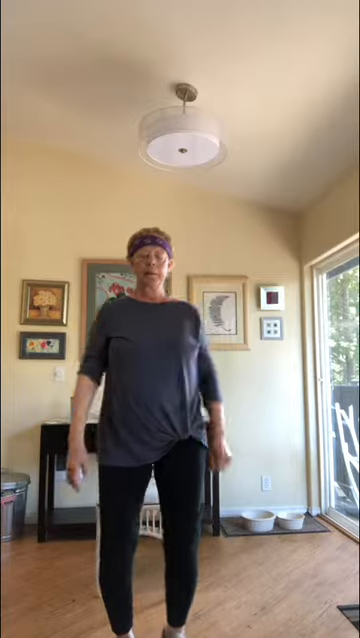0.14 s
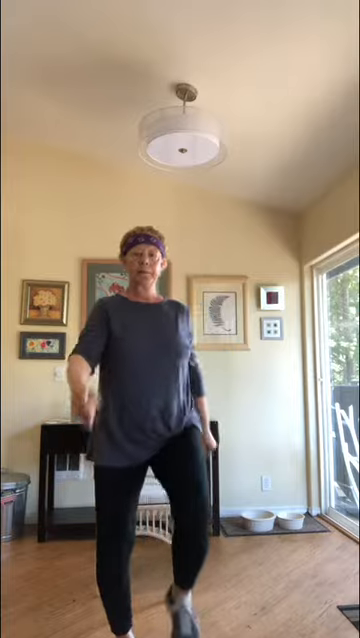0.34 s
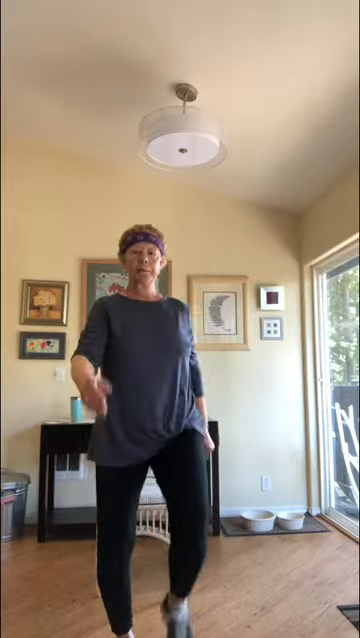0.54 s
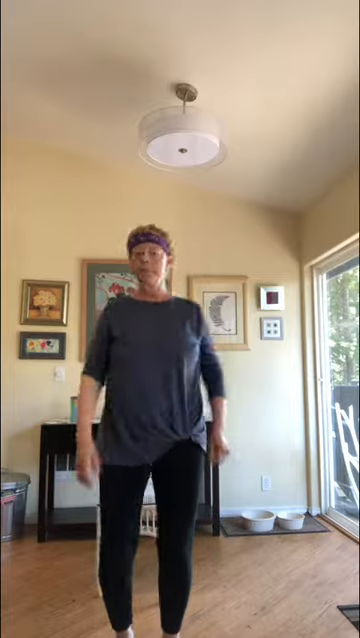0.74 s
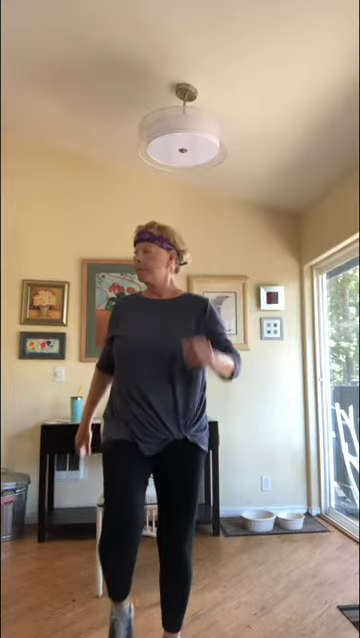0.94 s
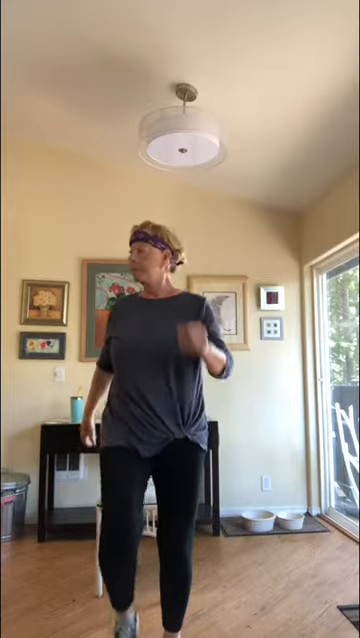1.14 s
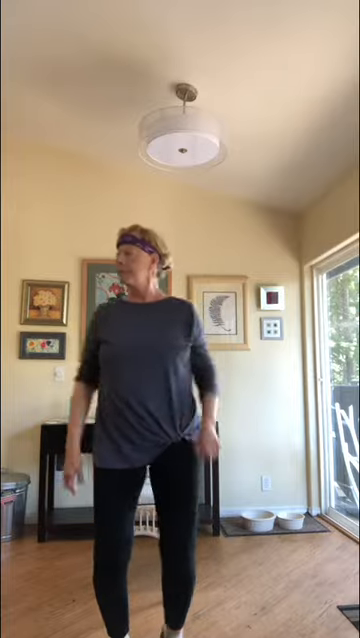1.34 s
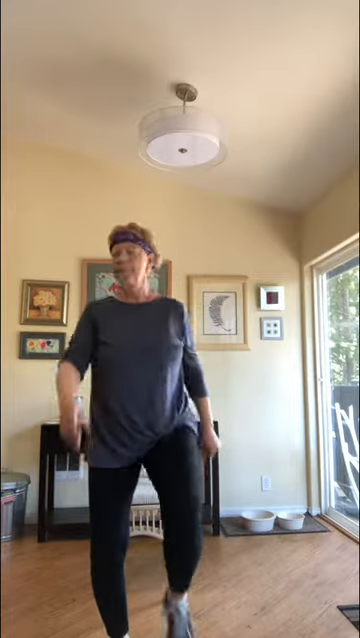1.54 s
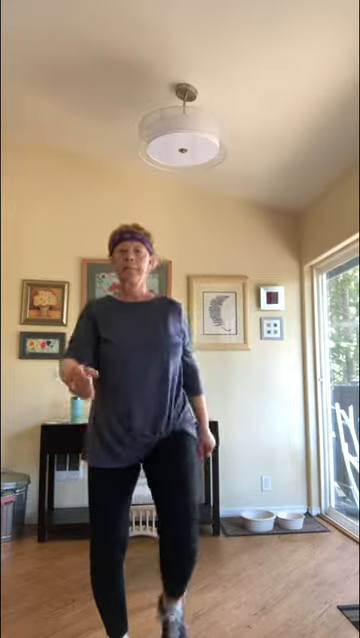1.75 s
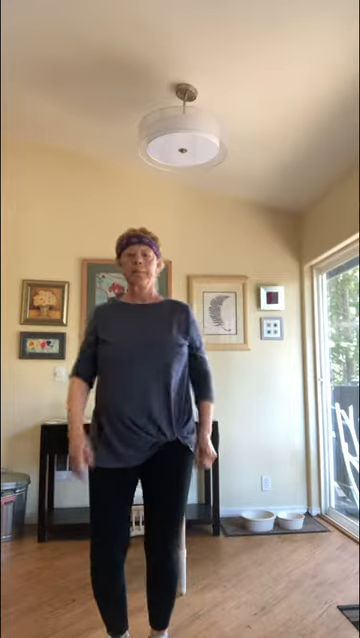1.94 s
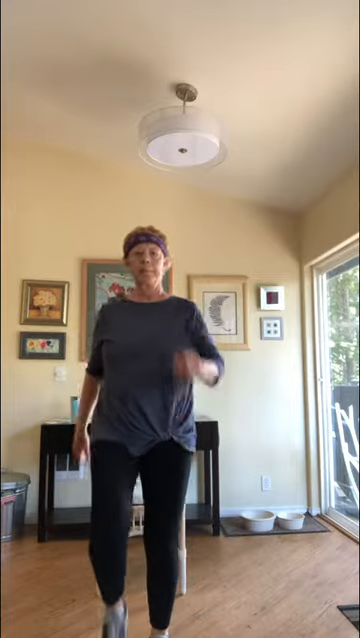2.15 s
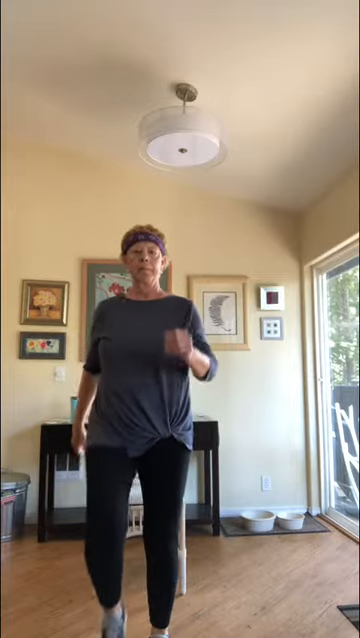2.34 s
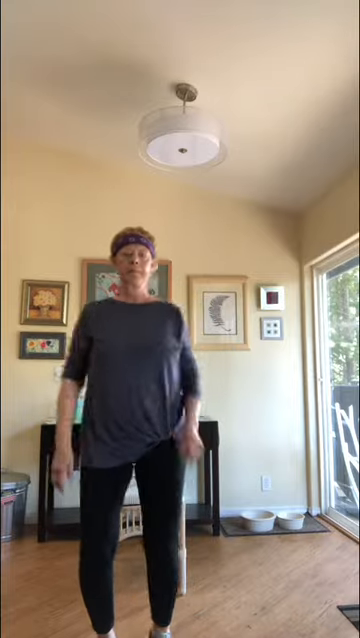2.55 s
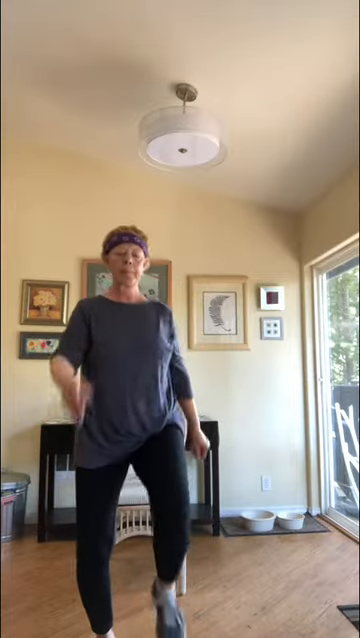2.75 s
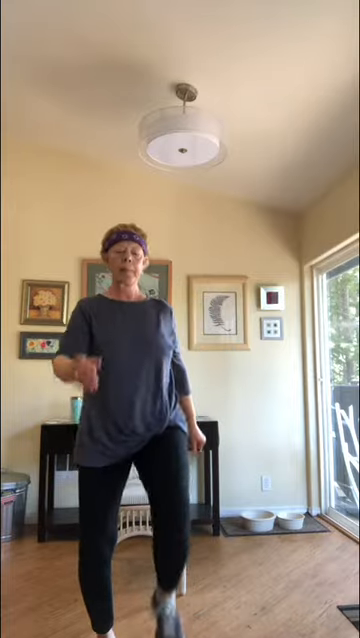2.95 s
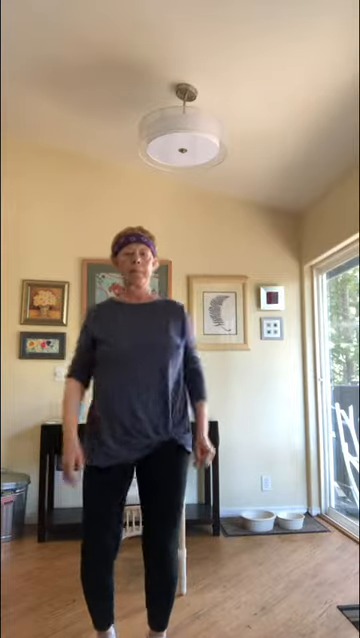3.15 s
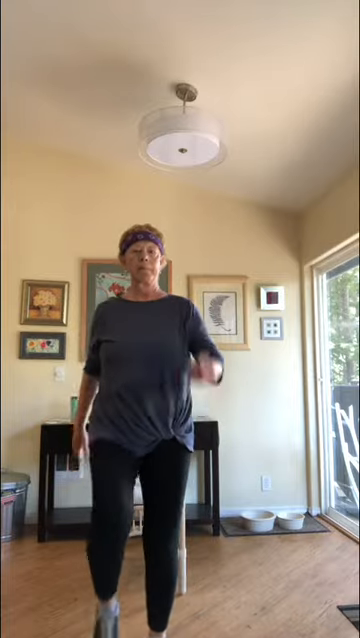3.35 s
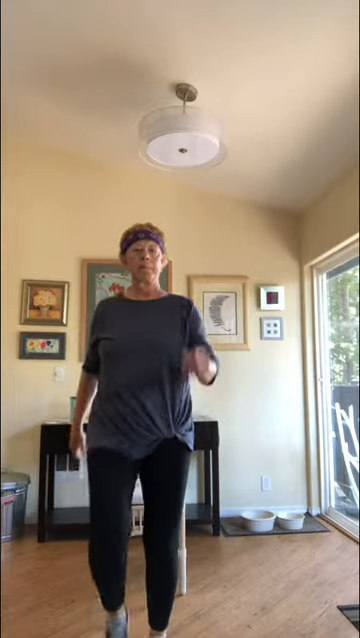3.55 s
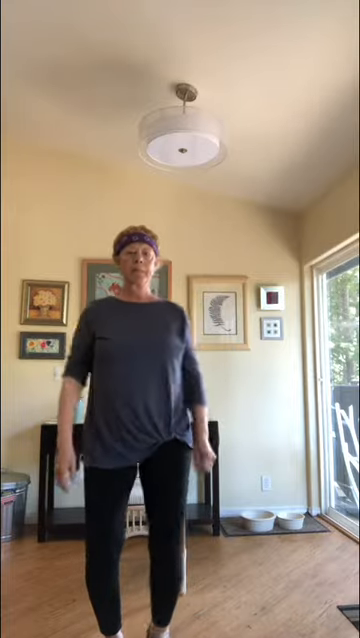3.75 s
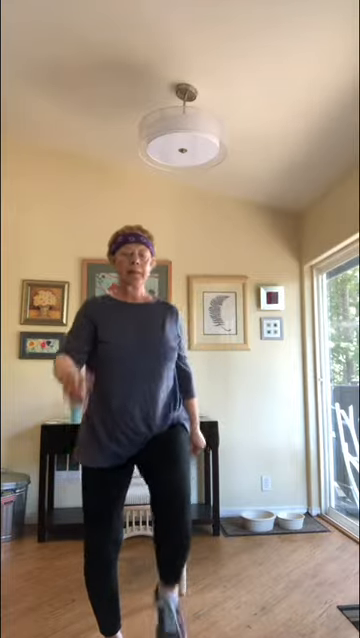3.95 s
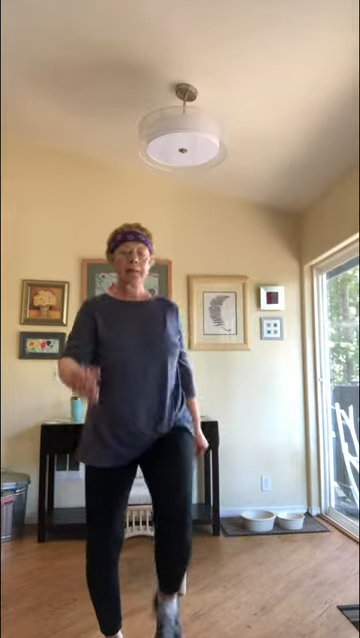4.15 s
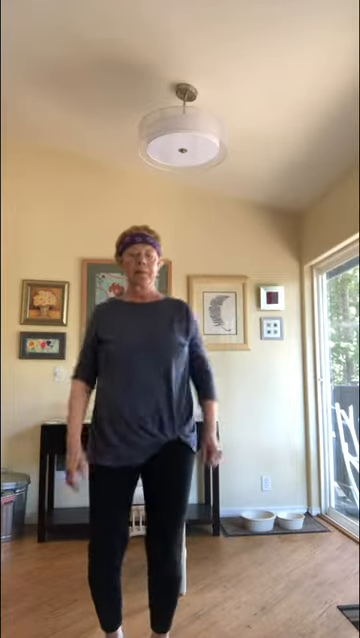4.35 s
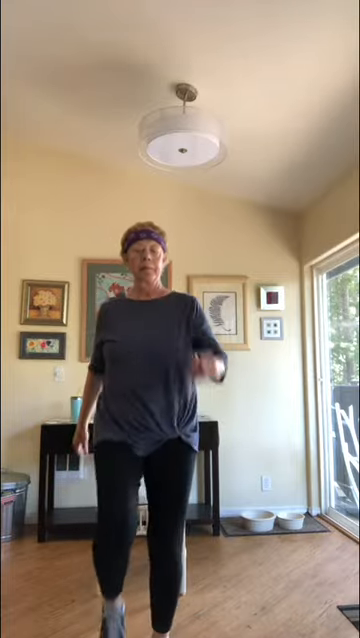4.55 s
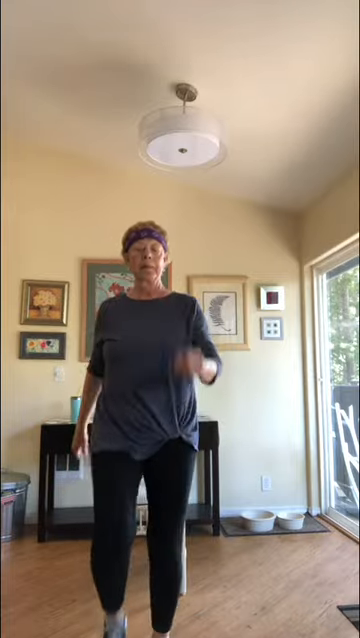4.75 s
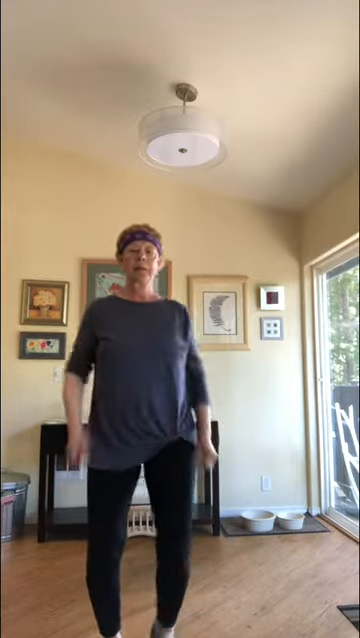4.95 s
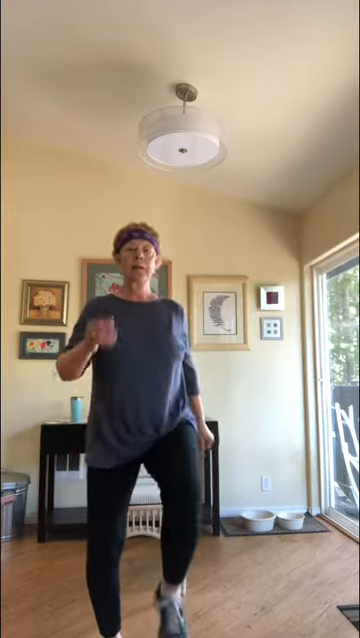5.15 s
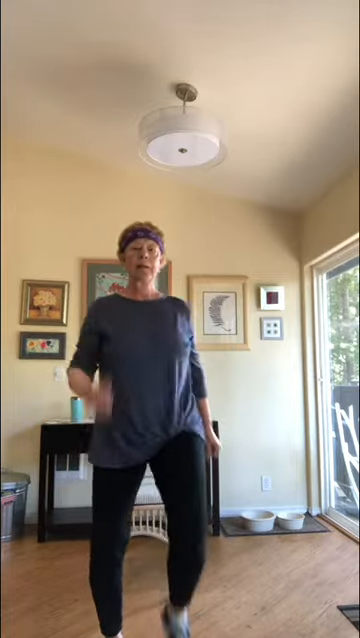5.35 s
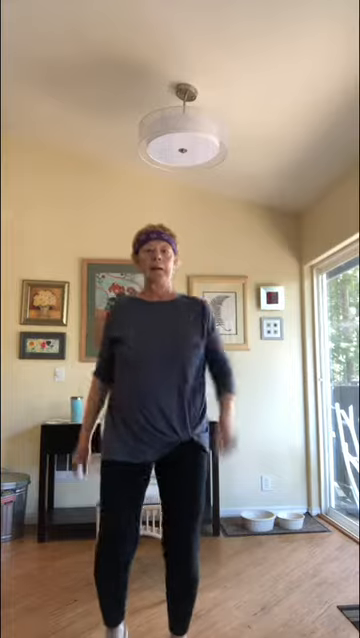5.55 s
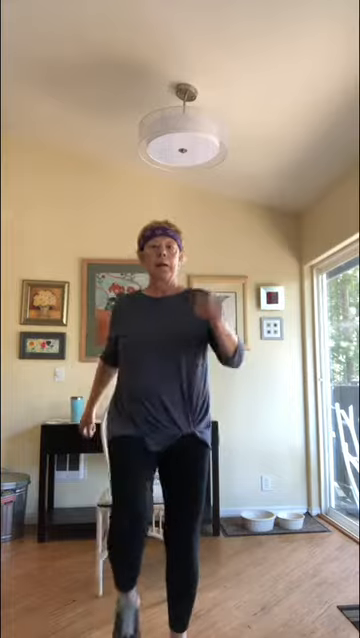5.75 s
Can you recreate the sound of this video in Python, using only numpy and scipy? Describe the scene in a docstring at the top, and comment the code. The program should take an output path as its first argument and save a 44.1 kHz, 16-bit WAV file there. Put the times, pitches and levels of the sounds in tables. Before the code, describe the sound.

Even marching footfalls thud and slap on springy wooden boards, a little under two per second, echoing briefly in a quiet home room.

```python
"""A bare, live room with a hardwood floor: someone in sneakers marches in place a few metres from the microphone.
Each footfall thumps the sprung floor and knocks its boards, both as damped modes, and the rubber sole slaps
the wood as a shaped pulse; small clicks, creaks and squeaks are short bursts of band-limited noise.
Floor, walls and ceiling answer with reflections and a noise tail, and the lowest room modes swell
behind each step. A thin ring hangs on faintly, and a hush of shaped noise, the room tone, lies under all."""
import sys
import numpy as np
from scipy import signal
from scipy.fft import rfft, irfft, next_fast_len
from scipy.io import wavfile
from scipy.ndimage import uniform_filter1d, map_coordinates

SR = 44100
rng = np.random.default_rng(int(sys.argv[2]) if len(sys.argv) > 2 else 0)


def dump_mix(stems):
    """Bounce the given channels to the path in sys.argv[1] as a 16-bit WAV at rate SR."""
    frames = np.atleast_2d(stems).T  # one column per channel
    limited = np.clip(frames, -1, 1)  # hard clip at full scale
    pcm = np.round(limited * 32767).astype(np.int16)
    wavfile.write(sys.argv[1], SR, pcm)


N = 259969  # samples

# room tone, spectrum before it is brought to AIR_DB: hz, density_db (per Hz)
AIR_SPECTRUM = [(15, -41), (25, -9), (76, -1), (161, -6.5), (236, -1.5), (659, -8.5), (818, -15),
                (936, -12.5), (1130, -13.5), (1610, -17), (2000, -21), (2760, -20.5), (7710, -25.5),
                (14800, -33), (16000, -33)]
# footfalls, right and left foot in turn: start_s, force_db, heel_first_db, flat_sole_db, sole_pitch_hz
FOOTFALLS = [(.0364, -1.5, -3.5, -3, 2200), (.6601, 0.5, -3.5, -3, 3160), (1.2573, -1.5, -1, -1, 2320),
             (1.858, 1, 2.5, -0.5, 2340), (2.4525, -2.5, 3, -1.5, 1770), (3.063, 2, 7.5, 2.5, 2220),
             (3.648, -1, -2.5, 0, 2360), (4.2582, 3.5, 6.5, -2.5, 1700), (4.8408, 1, -4.5, 2, 3600),
             (5.423, -0.1, 1.5, 3.5, 4040)]
# the sole clapping on wood, relative spectrum: hz, level_db
CLAP_SPECTRUM = [(100, -38), (500, 11), (900, -24.5), (1350, 1.5), (1900, 4.5), (2700, 1.6), (4200, 2.64),
                 (5500, -1), (7500, -6.5), (10000, -34.5), (16000, -47)]
# the edge of the sole snapping down, relative spectrum: hz, level_db
SNAP_SPECTRUM = [(1000, -26), (5000, -17), (7500, 7), (10000, 3), (12500, -4.5), (16000, -15)]
# modes of the sprung floor, relative levels: pitch_hz, width_hz, right_foot_db, left_foot_db
FLOOR_MODES = [(128.5, 20, 0.5, 0.5), (177, 80, -47, -6), (216, 20, -3, -8.5), (258, 30, -11.5, -10),
               (379, 178, 0.5, -2)]
# modes of the boards, relative levels: pitch_hz, width_hz, level_db
BOARD_MODES = [(516, 71, 6.5), (590, 80, 2), (680, 50, -2), (795, 210, -1.5)]
# decay of the diffuse tail: hz, t60_s
TAIL_T60 = [(60, 0.22), (160, 0.52), (420, 0.56), (1100, 0.57), (3000, 0.56), (7500, 0.58), (15000, 0.18)]
# diffuse tail against the direct sound, before its onset is shaped: hz, level_db
TAIL_LEVEL = [(40, 7.5), (90, 5.5), (160, 12), (350, 6.5), (800, 8), (3000, 1.5), (8000, -3), (15000, -1.5)]
# lowest room modes, levels before BOOM_DB and force: pitch_hz, level_db, t60_s
ROOM_MODES = [(53.1, -66.5, 0.64), (72.2, -72.5, 0.79), (98.6, -69, 0.64)]
# something in the room that rings when jolted, levels before TINGLE_DB and the step: pitch_hz, level_db
RING_PARTIALS = [(1351, -106), (1658, -86), (1841, -88.5), (2580, -92), (3300, -94)]
# clicks, creaks and squeaks of a shoe, levels before the band is cut out; the row at 1.949 s is # the heel of
# the step at 1.858 s coming down, and the row at 2.631 s is the ceiling's echo of the click at 2.618 s: #
# start_s, level_db, pitch_hz, decay_s (time constant), width (bandwidth over pitch)
CREAKS = [(.045, -14, 2400, .008, .5), (.0675, -25, 8000, .008, .9), (.064, -9, 500, .006, .6),
          (.181, -21, 3400, .014, .6), (.672, -12, 3470, .002, .7), (1.949, -12, 1230, .01, .6),
          (2.618, -23, 3200, .0006, 1.1), (2.631, -26, 4400, .001, 1.1), (3.704, -28, 6300, .003, .6),
          (4.766, -26, 2150, .002, .6), (4.841, -16, 10300, .001, .35), (4.8415, -6, 3900, .012, .35)]

T = np.arange(SR) / SR  # the second that follows a contact
HZ = np.fft.rfftfreq(SR, 1 / SR)
AIR_DB = -67.5
TOP_HZ = 16500
# an ordinary step: force raises all three, the heel the knock, a flat sole the slap
THUD_DB, KNOCK_DB, SLAP_DB = 5, -2, -11.5
# the sole's edge: level in an ordinary step, dB gained per dB of force and of flatness
SNAP_DB, SNAP_PER_FORCE, SNAP_PER_FLAT = -26, 1.47, 0.93
# lift from the air trapped under the sole, and dB of it lost per dB of heel
HOLLOW_DB, HOLLOW_PER_HEEL = 3, 0.3
BOOM_DB, TINGLE_DB = 17.5, 11  # the room modes follow the force, the faint ring follows the slap
WALL_S, WALL_GAIN = 0.0039, 0.19  # the nearest wall's reflection
CEILING_S, CEILING_GAIN = 0.0131, 0.8  # the strongest reflection
WANDER_S = 0.000317  # spread of both delays: the foot never lands on quite the same spot
# weak reflections from furniture: range of delays, gain, time constant of fading with delay
FURNITURE_FIRST_S, FURNITURE_LAST_S = 0.006, 0.032
FURNITURE_GAIN, FURNITURE_FADE_S = 0.23, 0.072


def amp(db):
    """Decibels to gain."""
    return 10 ** (np.asarray(db) / 20)


def unit(x):
    """x at rms 1."""
    return x / np.sqrt(np.mean(np.abs(x) ** 2) + 1e-20)


def along(points, hz):
    """Read (hz, value) points on a log frequency axis."""
    f, v = np.transpose(points)
    return np.interp(np.log(hz + 1), np.log(f + 1), v)


def causal(db):
    """Response of the shortest (minimum-phase) pulse that has this spectrum."""
    cepstrum = irfft(np.log(amp(db)))
    cepstrum[1:SR // 2] *= 2
    cepstrum[SR // 2 + 1:] = 0
    return np.exp(rfft(cepstrum))


def resonance(hz, width):
    """Response of one damped mode, 1 at its top."""
    return 1j * HZ * width / (hz ** 2 - HZ ** 2 + 1j * HZ * width)


def body(modes):
    """Causal response of a set of (hz, width_hz, level_db) modes, summed in power."""
    power = sum(np.abs(amp(db) * resonance(hz, width)) ** 2 for hz, width, db in modes)
    return causal(10 * np.log10(power + 1e-9))


def soft(corner_hz, order):
    """A cushioned contact passes little above its corner."""
    return causal(-10 * np.log10(1 + (HZ / corner_hz) ** (2 * order)))


def bass_loss(corner_hz):
    """Second-order loss of level below the corner."""
    return causal(-10 * np.log10(1 + (corner_hz / (HZ + 1)) ** (2 * 2)))


def band(hz, width, order=3):
    """Causal response of a steep-sided band, width times hz wide."""
    f = HZ + 1
    detuning = np.abs((f / hz - hz / f) / width)
    loss = np.minimum(1 + detuning ** (2 * order), 1e8)
    return causal(-10 * np.log10(loss))


def patter(length_s, first=0):
    """Spectrum of a first contact and the brief run of tiny ones behind it, mean power 1."""
    grains = rng.standard_normal(SR) * np.exp(-T / length_s)
    return unit(first + rfft(grains / np.linalg.norm(grains)))


def add(track, start_s, sound):
    """Mix a sound in at its start."""
    part = track[max(round(start_s * SR), 0):][:len(sound)]
    part += sound[:len(part)]


def room_tone(waver_db=0.9):
    """The room at rest: a steady, dull hush of shaped noise whose low part wavers a little."""
    hz = np.fft.rfftfreq(N, 1 / SR)
    noise = rfft(rng.standard_normal(N))
    hush = unit(irfft(noise * amp(along(AIR_SPECTRUM, hz)), N))
    low = irfft(rfft(hush) / (1 + (hz / 800) ** 2), N)
    # one random point every 5000 samples, joined smoothly
    drift = map_coordinates(rng.standard_normal(N // 5000 + 4), [np.arange(N) / 5000])
    return amp(AIR_DB) * (hush + low * (amp(waver_db * drift) - 1))


def slap(force_db, heel_db, flat_db, sole_hz, octaves=0.31):
    """The sole claps flat: the air under it lifts one band, less so heel first, and its edge snaps."""
    distance = np.log2((HZ + 1) / sole_hz) / octaves
    hollow_db = (HOLLOW_DB - HOLLOW_PER_HEEL * heel_db) / (1 + distance ** (2 * 2))
    clap_db = SLAP_DB + force_db + flat_db + along(CLAP_SPECTRUM, HZ) + hollow_db
    snap_db = SNAP_DB + SNAP_PER_FORCE * force_db + SNAP_PER_FLAT * flat_db + along(SNAP_SPECTRUM, HZ)
    power = amp(clap_db) ** 2 + amp(snap_db) ** 2
    return causal(10 * np.log10(power))


def thud(foot):
    """The body's weight bends the floor, which is too small to radiate deep bass."""
    modes = [(hz, width, levels[foot]) for hz, width, *levels in FLOOR_MODES]
    return body(modes) * bass_loss(85) * soft(530, order=2)


def knock():
    """The boards ring in damped modes, struck by a cushioned contact."""
    return body(BOARD_MODES) * soft(1230, order=4) * bass_loss(380)


def reflections(count=7, smear_s=0.00085):
    """Response of the nearest wall, the sloping ceiling and a scatter of weaker surfaces."""
    place = (np.arange(count) + rng.random(count)) / count
    scattered_s = FURNITURE_FIRST_S + (FURNITURE_LAST_S - FURNITURE_FIRST_S) * place ** 2
    main_s = np.array([WALL_S, CEILING_S]) + WANDER_S * rng.standard_normal(2)
    delay_s = np.r_[main_s, scattered_s]
    wall, ceiling, *furniture = np.exp(-2j * np.pi * delay_s[:, None] * HZ)
    weak = FURNITURE_GAIN * np.exp(-scattered_s / FURNITURE_FADE_S) @ np.array(furniture)
    smeared_ceiling = ceiling * patter(smear_s, first=1.3)
    return WALL_GAIN * wall + CEILING_GAIN * smeared_ceiling + weak


def even_noise(size_hz):
    """A second of noise whose early part has nearly the same energy in every band of this size."""
    noise = rng.standard_normal(SR)
    power = np.abs(rfft(noise * amp(-60 * T / 0.5))) ** 2
    smooth_power = np.abs(uniform_filter1d(power, size_hz))  # bins are 1 Hz apart
    return unit(irfft(rfft(noise) / np.sqrt(smooth_power + 1e-9)))


def diffuse_tail(build_s=0.0044, scatter=1.02, scatter_s=0.0086):
    """Dense late echoes: noise that builds up quickly, then decays at its own rate in each band."""
    hz, t, z = signal.stft(even_noise(size_hz=60), SR, nperseg=256)
    t60 = along(TAIL_T60, hz)[:, None]
    decay = amp(along(TAIL_LEVEL, hz)[:, None] - 60 * t / t60)
    same_energy = np.sqrt(2 * np.log(1000) / (t60 * SR))  # whatever the decay time
    tail = signal.istft(z * decay * same_energy, SR, nperseg=256)[1][:SR]
    build = 1 - np.exp(-T / build_s)
    nearby = 1 + scatter * np.exp(-T / scatter_s)  # nearby furniture scatters first
    return rfft(tail * build * nearby)


def room(mirror_hz=900, bass_share=0.7):
    """From one spot on the floor to the microphone: direct sound with early reflections, and the tail."""
    ratio = (HZ / mirror_hz) ** 2
    early = reflections() * (bass_share + ratio) / (1 + ratio)  # short waves mirror best
    return 1 + early * soft(7100, order=1), diffuse_tail()


def boom(swell_s=0.045):
    """The lowest room modes swell slowly after a footfall, then decay."""
    total = np.zeros(SR)
    for hz, db, t60 in ROOM_MODES:
        pitch_hz = hz + rng.normal(0, 1)
        total += amp(db - 60 * T / t60) * np.sin(2 * np.pi * pitch_hz * T)
    return (1 - np.exp(-T / swell_s)) ** 2 * total


def tingle(t60=2.4):
    """A faint, thin ring of decaying sines, faded out over its second, outlasts the room's tail."""
    total = np.zeros(SR)
    for hz, db in RING_PARTIALS:
        level_db = db + rng.normal(0, 1)
        total += amp(level_db - 60 * T / t60) * np.sin(2 * np.pi * hz * T)
    return (1 - T) * total


def footfalls(give_s=0.001675, knock_wet_db=-6, tread_s=0.001):
    """Slap, snap, thud and knock of every step, heard through the room, with boom and ring behind."""
    track = np.zeros(N)
    thuds = [thud(foot) for foot in range(2)]
    board_knock = knock()
    late = np.exp(-2j * np.pi * HZ * give_s)  # the boards give way just after the sole touches
    for k, (start_s, force_db, heel_db, flat_db, sole_hz) in enumerate(FOOTFALLS):
        near, tail = room()
        frayed = patter(tread_s, first=0.7)  # the tread frays the pulse; the tail averages this out
        sole = slap(force_db, heel_db, flat_db, sole_hz) * (frayed * near + tail)
        weight = amp(THUD_DB + force_db) * thuds[k % 2] * (near + tail)
        boards = amp(KNOCK_DB + force_db + heel_db) * board_knock * (near + amp(knock_wet_db) * tail)
        add(track, start_s, irfft(sole + (weight + boards) * late))
        add(track, start_s, amp(BOOM_DB + force_db) * boom())
        add(track, start_s, amp(TINGLE_DB + force_db + flat_db) * tingle())
    return track


def creaks(wet_db=-4):
    """Clicks, creaks and squeaks of a shoe, one heel coming down, and one click's ceiling echo: noise bursts in
    one band each."""
    track = np.zeros(N)
    for start_s, level_db, pitch_hz, decay_s, width in CREAKS:
        near, tail = room()
        tick = amp(level_db) * patter(decay_s) * band(pitch_hz, width)
        add(track, start_s, irfft(tick * (near + amp(wet_db) * tail)))
    return track


def scene():
    """One microphone feeds both channels."""
    mono = room_tone() + footfalls() + creaks()
    return np.array([mono, mono])


def record(dry):
    """The camera at the microphone's place keeps nothing above its band limit."""
    m = next_fast_len(N + SR // 2)
    kept = np.fft.rfftfreq(m, 1 / SR) < TOP_HZ
    return irfft(rfft(dry, m) * kept, m)[:, :N]


dry = scene()
out = record(dry)
dump_mix(out)
```